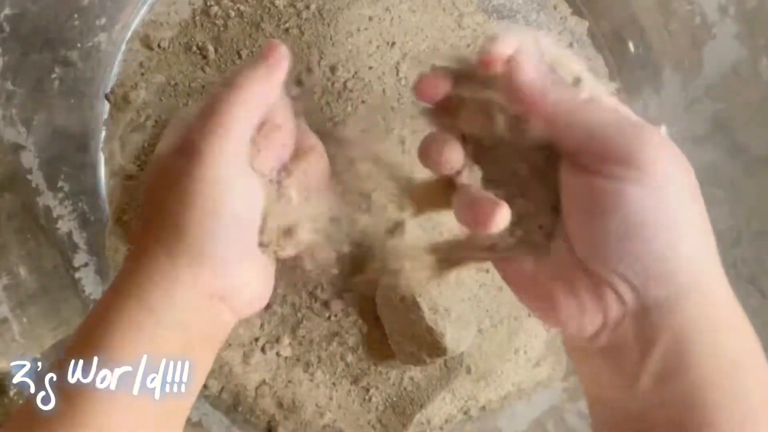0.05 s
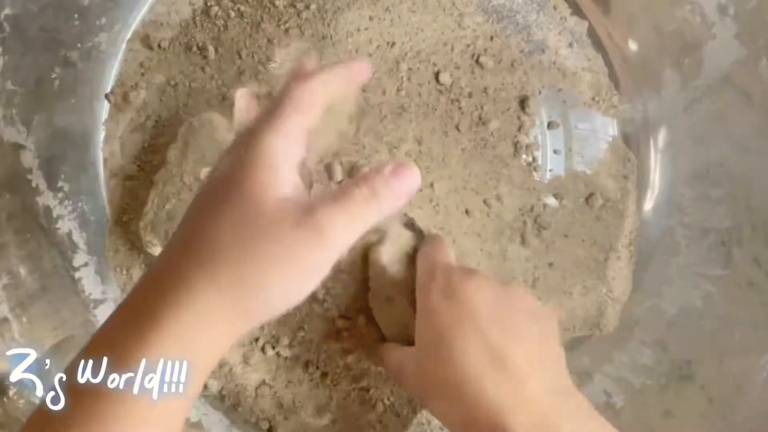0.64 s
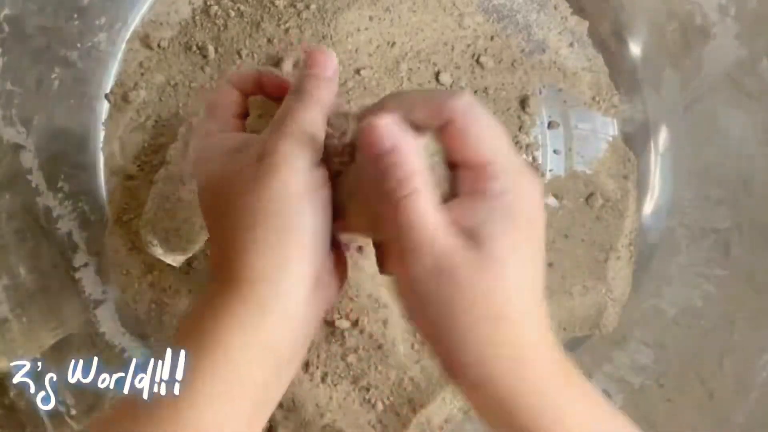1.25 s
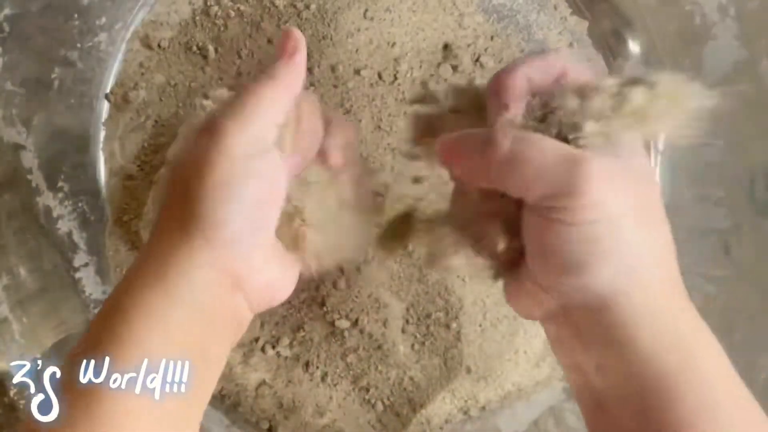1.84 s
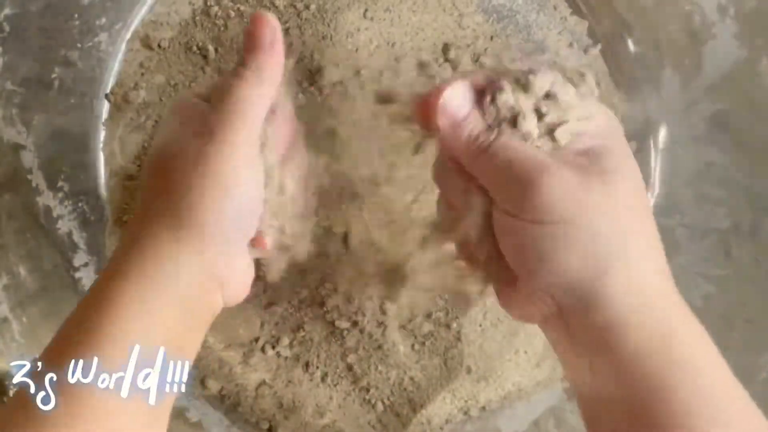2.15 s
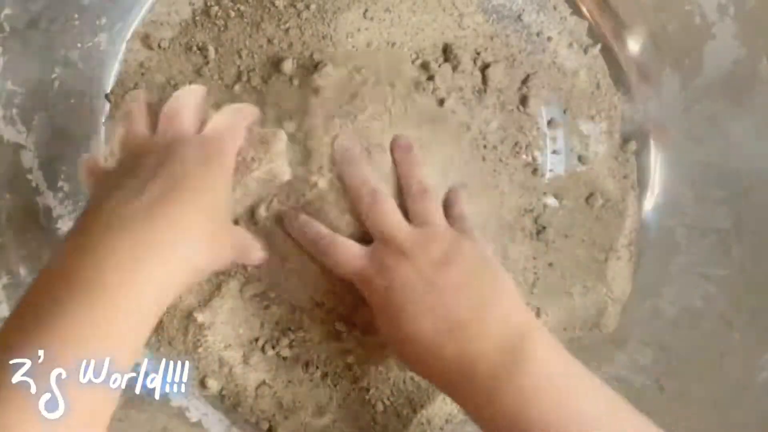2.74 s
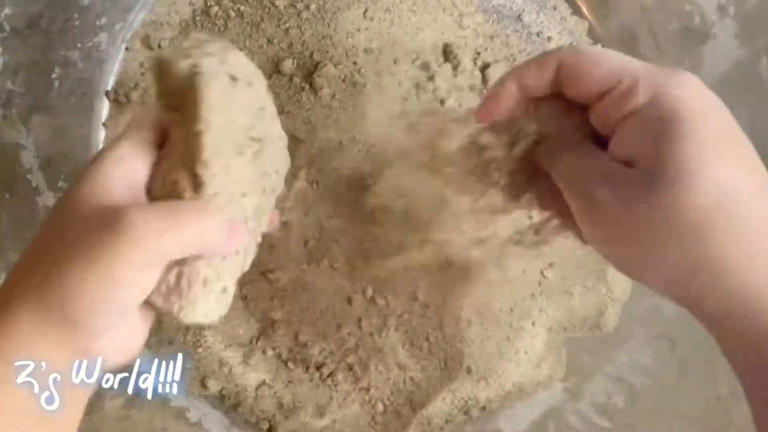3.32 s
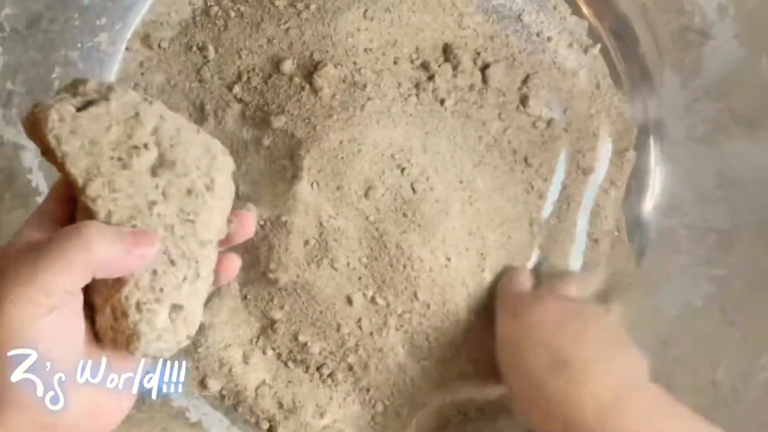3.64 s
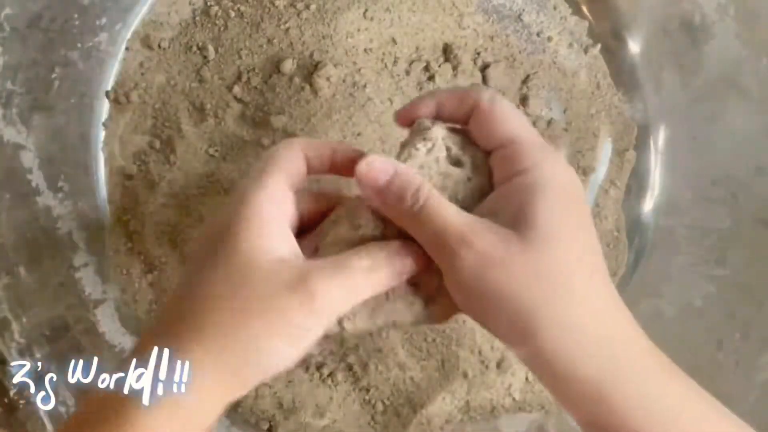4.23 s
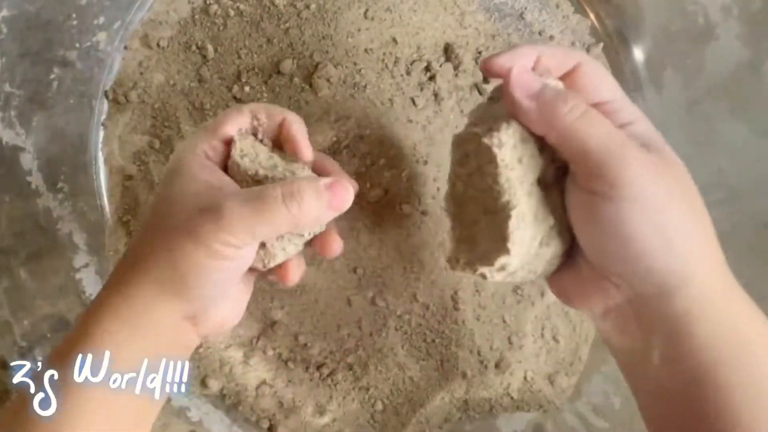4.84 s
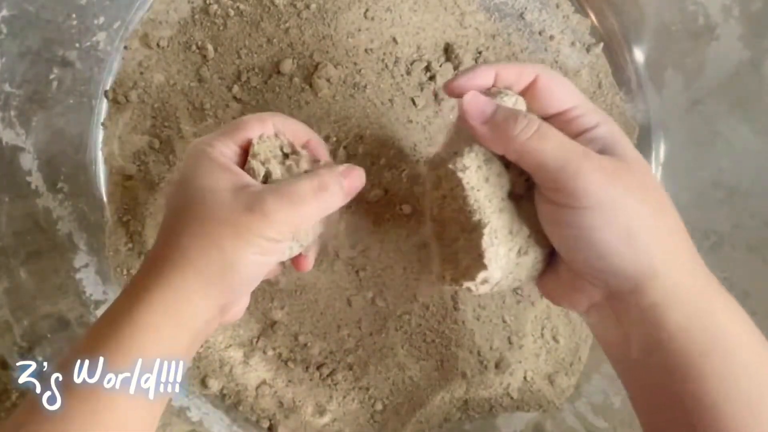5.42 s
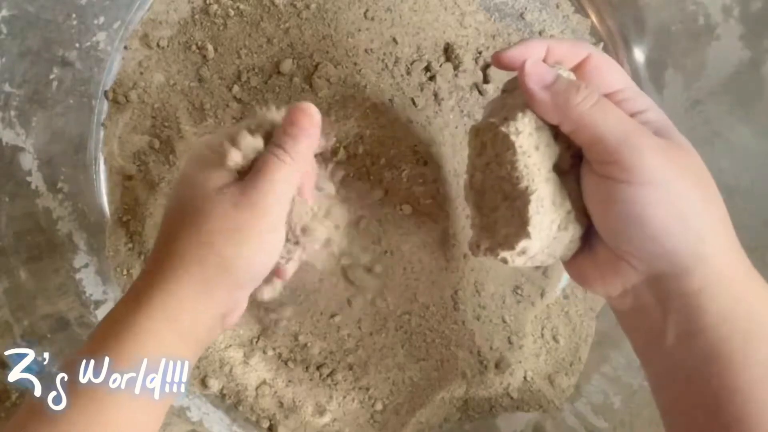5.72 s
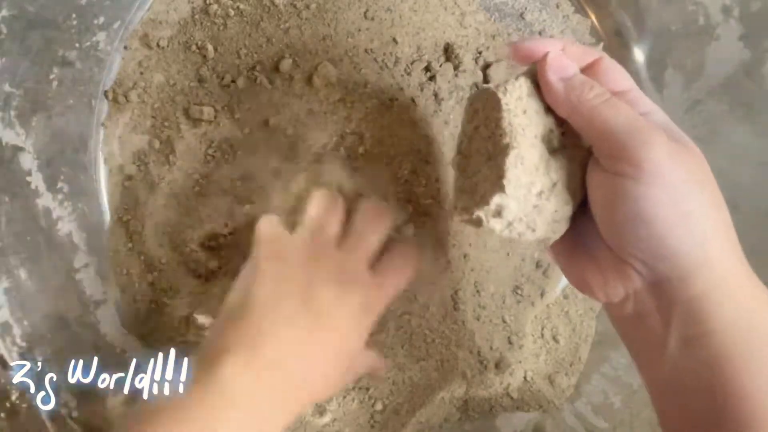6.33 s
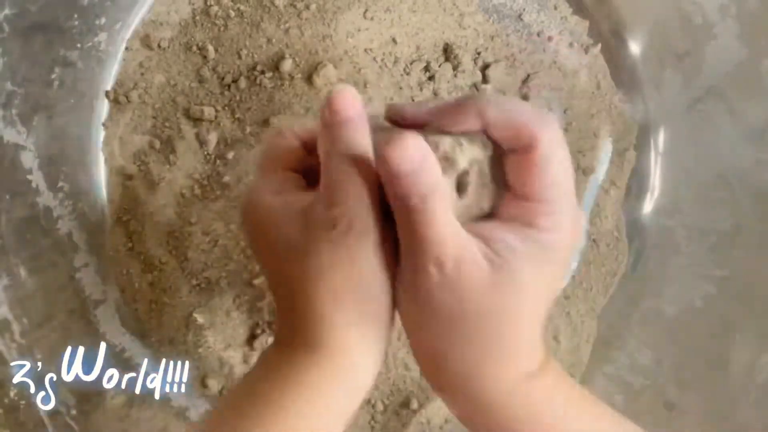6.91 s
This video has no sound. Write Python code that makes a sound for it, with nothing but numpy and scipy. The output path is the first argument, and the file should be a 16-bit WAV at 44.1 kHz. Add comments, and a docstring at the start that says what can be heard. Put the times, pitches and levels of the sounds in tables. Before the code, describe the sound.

A hard piece of dry sand strikes the rim of a steel bowl, ringing it briefly as grains trickle down. Hands then crush clumps in irregular crunches, with dull thumps from the bowl. After the loudest crack, about halfway, a hand sweeps sand along the metal wall. Softer gritty rubbing and small snaps follow, with one sharp click near the end. The microphone is close, in a quiet room.

```python
"""Two hands crush dry sand clumps over a steel bowl half full of sand, in a quiet room.
Clumps burst into many tiny clicks and land on the sand-damped bowl, which rocks with low thumps.
Crumbs snap, grit rubs under the fingers and loose sand trickles down. At the start one piece
strikes the bare rim and rings it; later a hand sweeps sand along the steel wall."""
import sys
import numpy as np
from scipy import signal
from scipy.fft import rfft, irfft
from scipy.io import wavfile

SR = 44100
rng = np.random.default_rng(int(sys.argv[2]) if len(sys.argv) > 2 else 0)


def wav_record(signal):
    """Record a signal, one row per channel, as 16-bit PCM in the file named by sys.argv[1]."""
    frames = np.transpose(np.atleast_2d(signal))
    bounded = np.clip(frames, -1, 1)
    # unit amplitude maps onto the largest positive 16-bit level
    quanta = np.round(bounded * 32767).astype(np.int16)
    wavfile.write(sys.argv[1], SR, quanta)


N = 307377
T = np.arange(N) / SR  # the time of each sample [s]

# Clumps that burst or land. "Focus" is how much quieter the sound gets per octave away from its pitch.
# (time [s], relative level [dB], rise [s], fade [s], pitch [Hz], focus [dB/octave])
CLUMP_BURSTS = [ (1.3754, -50.5, 0.00047, 0.002, 1280, 7.5), (1.412, -50, 0.0011, 0.0033, 420, 4),
                (1.498, -54.5, .002, 0.0023, 900, 7), (1.682, -49, 0.0014, 0.0036, 240, 12.5),
                (1.8595, -38.5, 0.0016, 0.012, 990, 3.5), (1.866, -41, 0.00091, 0.014, 3270, 11),
                (1.877, -35.5, 0.0029, 0.0081, 1090, 3), (1.892, -44.5, .001, 0.013, 2800, 11),
                (1.907, -47.5, 0.00091, 0.016, 950, 3.5), (2.223, -36, 0.000079, 0.00077, 1250, 13),
                (2.2388, -36.5, 0.0036, 0.0053, 1010, 6), (2.273, -44.5, 0.00086, .0035, 1300, 2.5),
                (2.653, -44, 0.00094, 0.0033, 1090, 5.5), (2.6714, -34, 0.0011, 0.0018, 676, 9),
                (2.7042, -48.5, 0.00035, 0.0045, 700, 7.5), (2.814, -42, 0.0034, 0.029, 1080, 7),
                (2.826, -34.5, 0.00026, 0.0023, 490, 10), (2.849, -45, 0.01, 0.0064, 510, 5),
                (3.356, -39.5, 0.0021, 0.0066, 2600, 6.5), (3.3647, -32.5, 0.00061, 0.0023, 920, 14),
                (3.3665, -23, 0.00029, 0.0057, 1400, 2.5), (3.371, -47, 0.0037, .005, 524, 21),
                (3.377, -46, 0.0018, 0.0091, 1200, -1), (4.178, -53, 0.00091, 0.0012, 380, 12.5),
                (5.744, -58, 0.0014, 0.005, 330, 2), (5.803, -61.5, 0.0034, 0.003, 700, 9),
                (6.855, -61.5, 0.0089, 0.055, 1420, 13)]
# The notes of the bowl's bottom, dulled by the sand on it: (pitch [Hz], width [Hz], relative level [dB])
BOTTOM_NOTES = [(357, 50, 4), (565, 45, 11), (912, 32, 7), (1020, 60, 0), (1415, 120, 1), (2900, 250, 0),
                (3350, 250, -2), (3848, 110, 2)]
def crunches(gain_db=-2.0, bottom_db=1.0):
    """Clumps collapse in a rush of grains that knocks the bottom of the bowl."""
    rush = undb(gain_db) * sum(burst(*row, spread_db=0.5, first_crack=3.5) for row in CLUMP_BURSTS)
    return rush + undb(bottom_db) * ringing(rush, BOTTOM_NOTES)


# Crumbs that snap off: (time [s], level [dB], fade [s], pitch [Hz], focus [dB/octave])
CRUMB_SNAPS = [(0.5991, -43, 0.0067, 6000, 7.5), (1.05, -49, 0.0061, 1700, 10.5),
               (1.086, -52, 0.01, 2970, 7.5), (1.454, -51, 0.018, 4800, 2), (1.502, -51, 0.0041, 2300, 8),
               (1.542, -61, .002, 4000, 6), (1.573, -55.5, .005, 3550, 1), (1.687, -48, 0.013, 2600, 7),
               (3.257, -58, .003, 2960, 7), (4.268, -59.5, 0.029, 3380, 14), (4.362, -58, 0.0022, 8000, 1),
               (4.594, -57, 0.0043, 4000, -2), (4.829, -59, 0.006, 3940, 6), (4.872, -57, .0015, 5500, 5),
               (4.985, -53, 0.0081, 4230, 3.5), (5.189, -58.5, 0.037, 4000, 2),
               (5.38, -54, 0.0037, 2700, 6.5), (5.4318, -48.5, 0.0019, 3730, 9),
               (5.465, -52.5, 0.018, 2490, 11), (5.49, -51, 0.0037, 2700, 7),
               (5.513, -51.5, 0.0026, 2570, 9), (5.688, -60, .002, 3500, 4),
               (6.159, -58.5, 0.0014, 8700, 4), (6.633, -58.5, 0.0059, 5000, 3),
               (6.695, -57.5, 0.0063, 3900, 25), (6.763, -35, 0.0009, 2930, 16),
               (6.7646, -41.5, 0.019, 3490, 22.5), (6.805, -57, 0.031, 3600, 6.5)]
def snaps(rise=0.0005):
    """Small cracks run through a crumb held in the air."""
    return sum(burst(start, db, rise, fade, hz, focus, spread_db=3.0, first_crack=4)
               for start, db, fade, hz, focus in CRUMB_SNAPS)


def burst(start, db, rise, fade, pitch_hz, focus, spread_db, first_crack):
    """A first crack sets off an avalanche of grains that swells and dies away."""
    age = T[:SR // 3]
    shape = np.minimum(age / rise, 1) * np.exp(-np.maximum(age - rise, 0) / fade)
    force = shape * unit(grains(12000, spread_db, size=len(age)))
    force[0] += first_crack * min(fade / rise / 10, 1)  # a more sudden break cracks harder
    sound = signal.fftconvolve(force, grain_click(pitch_hz, focus))
    sound *= undb(db) * np.sqrt(np.sum(shape ** 2) / np.sum(sound ** 2))
    return np.pad(sound, (max(int(start * SR), 0), N))[:N]


# The tone of dry sand breaking: (frequency [Hz], relative level [dB])
BREAKING_TONE = [(100, -19), (250, -1), (500, -0.5), (740, -2), (1100, 3), (2000, -4.5), (3300, -3),
                 (4800, 0.5), (6200, -5.5), (8300, -3), (10000, -12)]
def grain_click(pitch_hz, focus, bass_steepness=1.14, size=512):
    """The click of one grain: big pieces sound low, small ones high."""
    hz = np.maximum(np.arange(size // 2 + 1) * SR / size, 1)
    octaves = np.log2(hz / pitch_hz)
    loss_db = focus * np.abs(octaves) * np.where(octaves < 0, bass_steepness, 1)
    db = levels_at(BREAKING_TONE, hz) - loss_db
    # Turn these levels into a click that has its energy right at the start.
    cepstrum = irfft(np.log(undb(db)))
    return irfft(np.exp(rfft(2 * cepstrum[:size // 2], size)))


# Fingers rub or squeeze a clump: (time [s], length [s], relative level [dB], body [dB], hiss [dB])
FINGER_RUBS = [(0.12, .15, -64.5, 1, -3), (0.45, 0.14, -79.5, 9.5, 0), (0.645, .09, -72, -0.5, -3),
               (0.733, 0.35, -70, -9, -5.5), (1.033, 0.094, -63.5, -1, -5.5), (1.175, 0.1, -72.5, -2, -1.5),
               (1.355, 0.091, -66, -4, -4.5), (1.44, 0.16, -66, -14, -2.5), (1.592, 0.14, -61.5, -4, -3.5),
               (1.734, 0.18, -70, -2.5, -2), (2.287, 0.14, -61.5, -5, -4.5), (2.457, 0.029, -63.5, -9, -7),
               (2.57, 0.015, -79, 7, 10.5), (2.713, 0.2, -65.5, 7.5, -16), (2.942, 0.068, -67, 1, -15),
               (3.095, 0.12, -76, -2, -0.5), (3.915, 0.085, -70.5, -8, -5), (4.097, 0.12, -69.5, -9, -8.5),
               (4.252, 0.054, -67.5, -8, -1.5), (4.427, 0.028, -69.5, -17, -5),
               (4.537, 0.081, -73, -3, -14), (4.637, 0.19, -77, -15, -13), (4.947, 0.018, -70, -17, -6),
               (5.109, .115, -67, -24, -3.5), (5.273, 0.15, -70.5, -9, -4), (5.446, 0.058, -61, -6, -3.5),
               (5.504, 0.25, -69, -3.5, -5), (5.714, .1, -66.5, 1, -6.5), (5.914, 0.18, -71.5, 2, -5.5),
               (6.23, 0.24, -74.5, 3, -9), (6.454, 0.12, -74.5, 0, 3), (6.575, 0.26, -72.5, -7, -2.5),
               (6.838, 0.088, -59.5, -2, -9)]
def rubbing(coarse_db=-5, holding_db=-81.5):
    """Grit catches and slips under the fingers; coarse grains tick only under pressure."""
    fine = grit(per_s=14000, spread_db=0.0)
    pressed = fine + undb(coarse_db) * grit(per_s=260, spread_db=1.6)
    strokes = sum(stroke(start, length) * blend(pressed, db, body_db, hiss_db)
                  for start, length, db, body_db, hiss_db in FINGER_RUBS)
    holding = blend(fine, holding_db, body_db=-1.5, hiss_db=-2)  # grit shifts even in resting hands
    return (strokes + holding) * flutter(rate_hz=37, depth_db=1.62)


def stroke(start, length, fade=0.018, squeeze_db=3.5):
    """Finger pressure takes hold, tightens steadily and lets go."""
    progress = np.clip((T - start) / length, 0, 1)
    rise = 0.012 + 0.074 * length  # long strokes begin more gently
    grip = undb(squeeze_db * (progress - 1.5))
    return swell(start, rise, fade, hold=max(length - rise - fade, 0)) * grip


# The tone of moving grit: (frequency [Hz], relative level [dB])
GRIT_TONE = [(120, 6), (300, 5.5), (570, 1), (740, 1), (1100, 2.5), (1900, 1), (3200, 3.5), (4700, 1),
             (6400, -13), (8300, -7.5), (10000, -17)]
def grit(per_s, spread_db):
    """A stream of grains, split into three equally strong bands: middle rasp, low body and high hiss."""
    stream = colour(grains(per_s, spread_db), GRIT_TONE)
    bands_hz = [(1700, 5500), (180, 1500), (5700, 10500)]
    return np.array([unit(filtered(stream, 4, edges, "band")) for edges in bands_hz])


# Sand raining on the sand in the bowl: (time [s], relative level [dB], fade [s], body [dB], hiss [dB])
SAND_FALLS = [(0.0, -54.5, 0.19, -4, -9.5), (1.9, -61.5, 0.28, 2.5, -5.5), (2.24, -68, .16, 4.5, -6.5),
              (2.83, -65, 0.11, 4.5, -6), (3.62, -68, 0.24, -3, -11)]
def trickles(rise=0.02, coarse_db=-7):
    """Sand freed from a broken clump falls in uneven flurries and thins out."""
    bands = grit(per_s=11000, spread_db=1.3) + undb(coarse_db) * grit(per_s=310, spread_db=0.5)
    flow = sum(swell(start, rise, fade) * blend(bands, db, body_db, hiss_db)
               for start, db, fade, body_db, hiss_db in SAND_FALLS)
    return flow * flutter(rate_hz=25, depth_db=1.0)


# Fingers dig in loose sand: (time [s], level [dB], rise [s], fade [s], pitch [Hz], focus [dB/octave])
FINGER_SCOOPS = [(0.70, -67, 0.23, 0.053, 2880, 11), (0.95, -63.5, 0.051, .05, 2180, 6.5),
                 (2.921, -62, .04, 0.029, 3540, 19), (6.251, -69, 0.045, 0.037, 2950, 23),
                 (6.37, -65.5, 0.1, 0.05, 1820, 15)]
def scoops():
    """Grains slide past each other in a soft, hollow rush."""
    return sum(burst(*row, spread_db=2.5, first_crack=0) for row in FINGER_SCOOPS)


# A hand pushes sand along the wall: (time [s], relative level [dB], body [dB], singing of the steel [dB])
HAND_SWEEP = [(3.39, -48, 5, -1), (3.4, -55.5, -12, 6), (3.422, -54, -21, 9), (3.448, -52.5, 6, 9.5),
              (3.53, -51, 3, -4), (3.558, -57.5, -4, 2), (3.602, -55.5, -2, 0), (3.628, -67, 0, 2),
              (3.65, -59.5, -1, -11), (3.72, -74, 2, 4)]
# The notes of the wall under sliding sand: (pitch [Hz], width [Hz], relative level [dB])
WALL_NOTES = [(603, 35, 10), (912, 25, 9), (1418, 30, 3), (2715, 30, 3), (2847, 30, 7), (3018, 60, 11),
              (3295, 40, 6), (3444, 30, 2), (3565, 38, 5), (3856, 25, 2)]
def sweep(gain_db=-1.0, coarse_db=-7, body_gain_db=-4, singing_gain_db=-1, hollow_db=-3):
    """Sand dragged over steel sounds the wall's hollow low notes; where it bites, the high notes sing."""
    db, body_db, singing_db = curves(HAND_SWEEP)
    start, end = HAND_SWEEP[0][0], HAND_SWEEP[-1][0]
    touching = swell(start, rise=0.0029, fade=0.022, hold=end - start)
    bands = grit(per_s=12000, spread_db=-1.5) + undb(coarse_db) * grit(per_s=420, spread_db=3.5)
    drag = touching * blend(bands, db + gain_db, body_db + body_gain_db, hiss_db=-4.5)
    drag = filtered(drag, 3, 420, "high")  # the thin wall gives off no bass
    bite = undb(singing_db + singing_gain_db) * flutter(rate_hz=41, depth_db=4.0)
    hollow = undb(hollow_db) * ringing(drag, WALL_NOTES[:3])
    singing = ringing(drag * bite, WALL_NOTES[3:])
    return drag + hollow + singing


# The notes of the bare rim, in close pairs: (pitch [Hz], level [dB], time to fade by 60 dB [s])
RIM_NOTES = [(1280, -57, .7), (1469, -51, 1), (1557, -51, .76), (1642, -57, 1), (1775, -41, .82),
             (1857, -53, .8), (1925, -44, .57), (2005, -52, .55), (2123, -51, .7), (2157, -43, .67),
             (2217, -47, .5), (2251, -44, .61), (2462, -40, .13), (2552, -36, .11), (2728, -38, .13),
             (2825, -38, .12), (3008, -46, .3), (3106, -48, .3), (3348, -48, .25), (3436, -45, .32)]
def rim_strike():
    """A hard piece shatters on the bare steel at the start and leaves it ringing."""
    strike = burst(0, db=-33, rise=0.0016, fade=0.029, pitch_hz=2900, focus=7,
                   spread_db=1.5, first_crack=3.4)
    phases = rng.uniform(0, 2 * np.pi, len(RIM_NOTES))
    ring = sum(undb(db) * np.exp(-np.log(1000) * T / ring_s) * np.sin(2 * np.pi * hz * T + phase)
               for (hz, db, ring_s), phase in zip(RIM_NOTES, phases))
    return strike + ring


# Dull knocks of hands and lumps on the sand: (time [s], level [dB], pitch [Hz], rise and fade [s])
SOFT_KNOCKS = [(0.005, -49, 67, 0.026), (0.216, -45.5, 88, 0.0081), (0.379, -42.5, 36.2, 0.077),
               (0.484, -42.5, 34.6, 0.043), (0.51, -41.5, 66.3, 0.019), (1.08, -55.5, 74, 0.047),
               (1.402, -28, 59.5, 0.018), (1.448, -35, 33.9, 0.05), (1.681, -52.5, 234, 0.01),
               (1.785, -39, 79.5, 0.0055), (1.86, -28, 78.7, 0.0092), (2.191, -39, 56, 0.021),
               (2.247, -34, 77.2, 0.03), (2.254, -44, 130, 0.0088), (2.272, -48.5, 220.6, 0.01),
               (2.57, -43, 49.3, 0.023), (2.735, -31, 33.9, 0.039), (2.941, -42.5, 55, .03),
               (3.378, -33.5, 64.7, 0.024), (3.406, -37.5, 35.5, 0.015), (3.609, -41.5, 70.5, 0.02),
               (4.279, -43, 63, 0.014), (4.332, -44.5, 256, 0.0014), (4.692, -32.5, 62.5, 0.01),
               (5.462, -47, 68.4, 0.033), (5.659, -50, 33, 0.025), (5.747, -47, 292, 0.0015),
               (5.798, -48, 240, 0.0014), (5.813, -37.5, 55.7, 0.017), (6.898, -44, 50.2, 0.035)]
# The tone of the low rumble: (frequency [Hz], relative level [dB])
RUMBLE_TONE = [(15, -3.5), (33, 5.5), (48, -9), (72, -4.5), (100, -11.5), (125, -15.5), (180, -31),
               (300, -29), (800, -77.5)]
def rocking(resting_db=-57, effort_db=9, shudder_db=-8.5):
    """Knocks swing the heavy bowl briefly; it shudders on, over the rumble of working hands."""
    effort_power = sum((undb(db + effort_db) * stroke(start, length)) ** 2
                       for start, length, db, *_ in FINGER_RUBS)
    rumble_power = undb(resting_db) ** 2 + effort_power
    swings = np.zeros(N)
    for start, db, hz, fade in SOFT_KNOCKS:
        age = np.maximum(T - start, 0)
        shape = age / fade * np.exp(1 - age / fade)
        swings += undb(db) * shape * np.sin(2 * np.pi * hz * age)
        shudder = undb(db + shudder_db) * swell(start, rise=0.015, fade=0.084)
        rumble_power += shudder ** 2
    return swings + np.sqrt(rumble_power) * colour(rng.standard_normal(N), RUMBLE_TONE)


def room_echo(sound, echo_s=0.17, echo_db=-17):
    """The walls of the small room send back a short, faint echo."""
    age = T[:SR // 2]
    tail = rng.standard_normal(len(age)) * np.exp(-np.log(1000) * age / echo_s) * (age > 0.004)
    tail = filtered(tail, 1, 5000, "low")
    tail /= np.sqrt(np.sum(tail ** 2))
    return undb(echo_db) * signal.fftconvolve(sound, tail)[:N]


# The tone of the quiet room: (frequency [Hz], relative level [dB])
AIR_TONE = [(15, -20.5), (25, 1), (56, -6.5), (124, -6.5), (181, -18.5), (414, -23.5), (560, -19.5),
            (756, -28.5), (4710, -36), (6530, -42.5), (8180, -38.5), (10000, -47.5), (13000, -90),
            (22000, -120)]
def room_air(level_db=-61.5):
    """A faint, steady, mostly low noise fills the room."""
    return undb(level_db) * colour(rng.standard_normal(N), AIR_TONE)


def grains(per_s, spread_db, size=N):
    """Tiny cracks at random moments: many weak, a few strong."""
    present = rng.random(size) < per_s / SR
    strength = undb(spread_db * np.minimum(rng.exponential(size=size), 5))
    return present * strength * rng.standard_normal(size)


def blend(bands, db, body_db, hiss_db):
    """Coarse pieces add body to the rasp, and fine dust adds hiss."""
    rasp, body, hiss = bands
    return undb(db) * (rasp + undb(body_db) * body + undb(hiss_db) * hiss)


def ringing(force, notes):
    """Pushed by a force, the steel rings at its own notes; narrow ones ring longer."""
    return sum(undb(db) * signal.lfilter(*signal.iirpeak(hz, hz / width, fs=SR), force)
               for hz, width, db in notes)


def swell(start, rise, fade, hold=0):
    """A volume that climbs, holds and dies away."""
    age = T - start
    return np.clip(age / rise, 0, 1) * np.exp(-np.maximum(age - rise - hold, 0) / fade)


def flutter(rate_hz, depth_db):
    """A volume that wavers at random."""
    wobble = unit(filtered(rng.standard_normal(N), 2, rate_hz, "low"))
    return undb(depth_db * wobble)


def filtered(sound, steepness, hz, keep):
    """Keep the lows, the highs or a band in between."""
    return signal.sosfilt(signal.butter(steepness, hz, keep, fs=SR, output="sos"), sound)


def colour(sound, tone):
    """Give a sound the tone in a table, at an average strength of 1."""
    hz = np.maximum(np.arange(N // 2 + 1) * SR / N, 1)
    return unit(irfft(rfft(sound) * undb(levels_at(tone, hz)), N))


def levels_at(tone, hz):
    """Read a tone table's levels at the given frequencies."""
    known_hz, db = np.transpose(tone)
    return np.interp(np.log(hz), np.log(known_hz), db)


def curves(rows):
    """Join a table's points in time, giving each column one value per sample."""
    times, *columns = np.transpose(rows)
    return [np.interp(T, times, column) for column in columns]


def undb(db):
    """Turn decibels into a number to multiply by."""
    return 10 ** (np.asarray(db) / 20)


def unit(sound):
    """Scale to an average strength (rms) of 1."""
    return sound / np.sqrt(np.mean(sound ** 2))


def scene():
    """Hands, sand and bowl over the room's quiet air, in one channel."""
    sand = rubbing() + trickles() + sweep() + crunches() + snaps() + scoops() + rim_strike()
    air = room_air()
    return (sand + room_echo(sand) + rocking() + air)[None]


def record(dry, top_hz=10200):
    """The nearby phone cuts off the highest treble."""
    return signal.sosfilt(signal.ellip(10, 0.2, 70, top_hz, fs=SR, output="sos"), dry)


dry = scene()
out = record(dry)
wav_record(out)
```